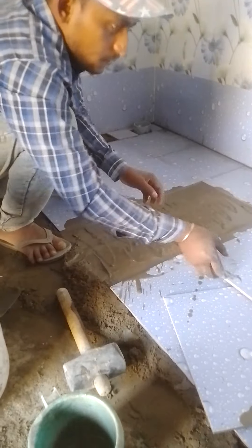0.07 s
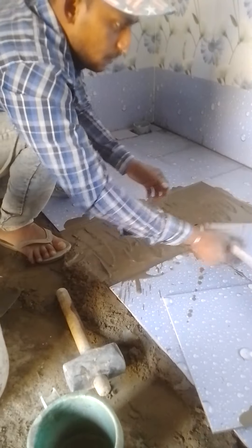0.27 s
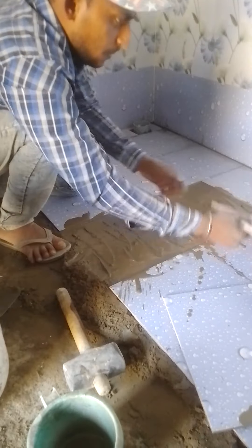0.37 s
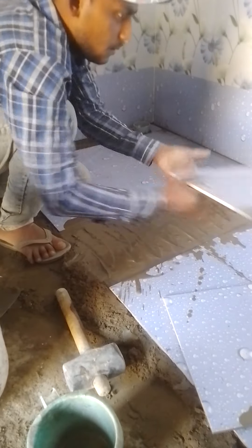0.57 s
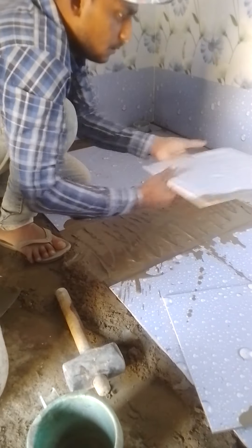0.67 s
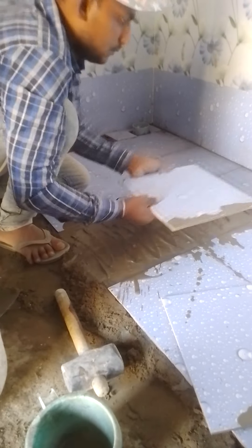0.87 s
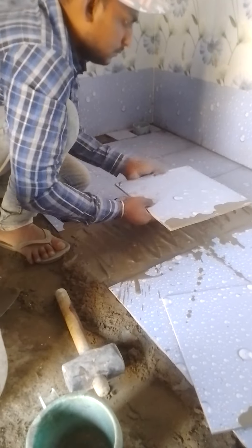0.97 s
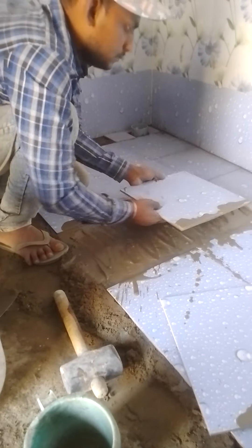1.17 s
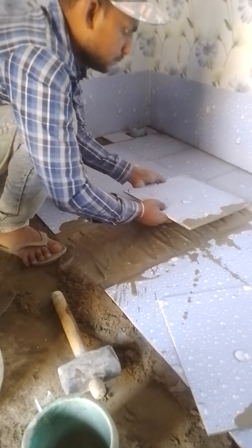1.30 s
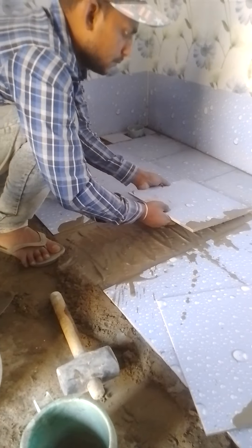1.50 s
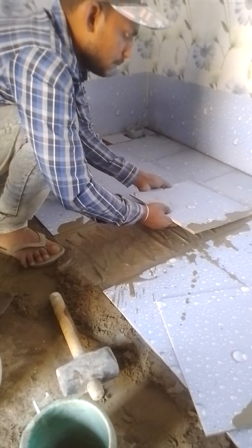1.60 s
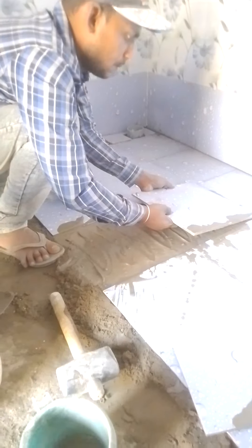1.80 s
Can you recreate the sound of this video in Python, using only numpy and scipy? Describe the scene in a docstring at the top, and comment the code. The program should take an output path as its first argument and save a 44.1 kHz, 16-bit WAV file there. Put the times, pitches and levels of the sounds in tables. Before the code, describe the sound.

In a small, hard-walled bathroom, two ceramic tiles knock together in a quick, ringing clatter. A light tick and faint sliding follow, then one tile settles into wet mortar with a muffled thud, over a faint, low motor hum.

```python
"""A ceramic floor tile clatters against another as it is picked up in a small tiled bathroom.
Each knock makes both tiles ring. The tile ticks once more, and its gritty edge slides off the other.
Then it is laid on wet mortar, which muffles it to a soft, gritty thud.
The hard walls ring after the knocks, slides and thud, and a distant motor hums low."""
import sys
import numpy as np
from scipy import signal
from scipy.fft import rfft, irfft
from scipy.io import wavfile
from scipy.ndimage import uniform_filter1d

SR = 44100
rng = np.random.default_rng(int(sys.argv[2]) if len(sys.argv) > 2 else 0)


def bounce(signal):
    """Save signal as a 16-bit WAV file at the path given by the first command-line argument."""
    frames = np.transpose(np.atleast_2d(signal))
    limited = np.clip(frames, -1, 1)
    pcm = np.round(limited * 32767).astype(np.int16)
    wavfile.write(sys.argv[1], SR, pcm)


N = 81585
TIME = np.arange(N) / SR

# Levels are relative. A ring_s is the time to fade by 60 dB; a decay_s, to fall to about a third.
# Tile hitting tile: start_s, level_db, bass_db, treble_db, held_tile_db, snap_db, contact_decay_s
KNOCK_EVENTS = [(0.2063, -4, -4.5, 1.5, -13, -21, 0.0062), (0.2228, -3, 5, 2, 6, -18, 0.0091),
                (0.2270, -2, -1, 1.5, -31, -6, 0.0032), (0.2435, -3.5, 2.5, -23, -18, -7.5, 0.008),
                (0.250, -9, -2, 0, 4, -21, 0.0045), (0.262, -5, 7.5, -2, -12.5, -14, 0.00674),
                (0.275, -5, 1.5, -1, -4, -18, 0.0051), (0.288, -6.5, 3.5, 3, -6, -18, 0.0055),
                (0.319, -8, 0, 1.5, 0.5, -14, 0.0046), (0.3240, -7, 3.5, -3.5, 3, -4, 0.0059),
                (0.332, -9.5, -19, 2, 1, -12, 0.0055), (0.4822, -15.5, -6.5, 3.5, 11, -1, 0.0045)]
# Ringing notes of the tile that is hit: pitch_hz, level_db, ring_s
STRUCK_TILE_NOTES = [(669, -6, 0.17), (706.6, -2, 0.12), (738, -6.5, 0.13), (1115, -6.5, 0.17),
                     (1150, -4.5, 0.077), (1196, -5, 0.063), (1628, -1, 0.1), (1735, -10, 0.2),
                     (2040, 2, 0.14), (2103, -3.5, 0.083), (2680, -3, .08), (2880, -14, 0.14),
                     (3163, -3, 0.078), (3280, -4.5, 0.17), (3790, -0.5, 0.048), (4143, 7.5, 0.068),
                     (4166, -9, 0.1), (4230, -5.5, 0.039), (4420, -4.5, 0.036), (4854, -5.5, 0.11),
                     (5770, -7.5, 0.059), (6130, -15, 0.13), (6560, -12, 0.037)]
# Ringing notes of the tile in the hands: pitch_hz, level_db, ring_s
HELD_TILE_NOTES = [(1155, -14.5, 0.046), (1410, -13, 0.094), (1782, -7.5, 0.11), (2062, -6.5, .12),
                   (2188, -1.5, 0.078), (2275, -3.5, 0.15), (2561, -4, 0.096), (3077, -11.5, .15),
                   (3586, -12, 0.063), (3870, -3.5, 0.2), (4148, -10, .12), (4760, -12, 0.06),
                   (6800, -20, 0.03)]
# Broad clack as the tiles meet: pitch_hz, level_db
CLACK_SPECTRUM = [(40, -21.5), (130, -11), (230, 0.5), (350, -17), (550, -16), (850, -10.5), (1200, -3),
                  (2500, -2), (4400, -2), (5300, -8.5), (6800, -8.5), (7800, -28.5), (10000, -35.5),
                  (13000, -45.5), (15500, -48)]
# Bright snap of the glaze, the tile's glassy coat: pitch_hz, level_db
SNAP_SPECTRUM = [(300, -5), (2500, -9.5), (7000, 7), (8500, -12.5), (11000, -18), (13500, -22.5),
                 (15500, -34.5)]
# Chinks of glaze on glaze: start_s, level_db
CHINK_EVENTS = [(0.2275, -40), (0.324, -23), (0.4804, -31)]
# Thin, high sound of a chink: pitch_hz, level_db
CHINK_SPECTRUM = [(500, -25), (2500, 2), (7000, 15), (8500, 0.5), (11000, -18), (13500, -26), (15500, -29)]
# Dull push of the tile's weight on the floor: pitch_hz, level_db
THUMP_SPECTRUM = [(25, -14), (60, -10), (120, -4), (220, 0), (450, -2), (650, -12), (1500, -35),
                  (6000, -70)]
# Edge sliding over tile: start_s, rise_s, hold_s, decay_s, level_db, bass_db, treble_db
SLIDE_STROKES = [(0.033, 0.0042, .01, 0.26, -56, 8, 5), (0.154, 0.052, .002, 0.0029, -34, -4, 2.5),
                 (0.377, 0.025, 0.016, 0.0089, -38, -34, 2.5), (0.61, 0.065, 0.059, 0.054, -47, 8.5, 5),
                 (0.77, 0.014, 0.043, 0.017, -47, 5, 3.5)]
# Tile pressed into mortar: start_s, rise_s, hold_s, decay_s, level_db, bass_db, treble_db
PRESS_STROKES = [(0.908, 0.0097, 0.043, 0.021, -37, -2.5, -1.5),
                 (0.947, 0.0082, 0.058, 0.047, -36, -4, -0.5),
                 (1.034, 0.0054, 0.014, 0.15, -51.5, 5.5, 11.5)]
# Squash of wet mortar: pitch_hz, level_db
SQUASH_SPECTRUM = [(40, -23.5), (110, -30), (180, -5.5), (450, 0), (800, -4.5), (1500, -9.5), (2500, -12.5),
                   (4200, -18), (6500, -29), (8500, -45), (15000, -68)]
# Muffled notes of the tile lying on mortar: pitch_hz, level_db, ring_s
LAID_TILE_NOTES = [(278.6, -8.5, 0.38), (365, -9, 0.43), (436.8, -3.5, 0.47), (619, -5, 0.28),
                   (752, -15, .15), (1010.5, -8, .15), (1427, -8.5, 0.094), (1586, -12.5, .08)]
# How long the bathroom rings: pitch_hz, ring_s
ROOM_RING_TIMES = [(100, 3.86), (250, 2.5), (400, 0.85), (700, 0.59), (1200, 0.66), (2200, 0.59),
                   (4000, 0.33), (6800, 0.38), (9000, .4), (14000, .38)]
# Rise and fall of the distant motor: time_s, level_db
HUM_LEVELS = [(0, -48.5), (0.45, -52.5), (0.7, -51), (1.15, -63.5), (1.28, -53), (1.36, -44.5), (1.5, -40),
              (1.61, -50), (1.72, -41), (1.85, -42)]
# Quiet room air: pitch_hz, level_db
AIR_SPECTRUM = [(20, -7), (50, -5.5), (85, 0.5), (125, -0.5), (185, 5.5), (250, -9), (400, -12), (700, -19),
                (1200, -19.5), (2000, -17.5), (4000, -19.5), (5200, -34.5), (6500, -29), (8500, -55.5),
                (12000, -55), (15500, -71)]
# Lingering echo of earlier work: pitch_hz, level_db
ECHO_SPECTRUM = [(60, -1), (250, 1), (600, -7.5), (2200, -11.5), (4300, -21.5), (6800, -17), (8500, -36),
                 (15000, -41)]


def knocks(level_db=7.5, glaze_db=-10.5):
    """Each knock is a short rattle that rings both tiles and adds a snap of glaze."""
    out = np.zeros(N)
    for start_s, knock_db, bass_db, treble_db, held_db, snap_db, decay_s in KNOCK_EVENTS:
        body = through(both_tiles(struck_db=-2, held_db=held_db), tone(bass_db, treble_db))
        add(body, 0, amp(glaze_db + snap_db) * click(SNAP_SPECTRUM))
        add(out, start_s, amp(level_db + knock_db) * through(rattle(decay_s), body))
    return out


def both_tiles(struck_db, held_db, clack_db=7):
    """One touch makes a clack and sets each tile ringing at its own notes."""
    body = amp(struck_db) * ring(STRUCK_TILE_NOTES, spread_db=1.5)
    body += amp(held_db) * ring(HELD_TILE_NOTES, spread_db=1.5)
    add(body, 0, amp(clack_db) * click(CLACK_SPECTRUM))
    return body


def rattle(decay_s, first_touch=0.214):
    """The force between two edges: a first touch, then a brief chatter."""
    t = TIME[:SR // 25]
    force = rng.standard_normal(len(t)) * np.exp(-t / decay_s)
    force /= np.linalg.norm(force)
    force[0] += first_touch
    fade = np.exp(-(t / (3 * decay_s)) ** 2)
    for _ in range(4):  # make all pitches about equally strong, but keep the rattle short
        flat_spectrum = np.exp(1j * np.angle(rfft(force, 2 * len(t))))
        force = irfft(flat_spectrum)[:len(t)] * fade
    return force / np.linalg.norm(force)


def chinks(rise_s=0.002, decay_s=0.0048):
    """Three of the knocks, including the last light tick, add a brief, bright chink."""
    out = np.zeros(N)
    burst = np.minimum(TIME / rise_s, 1) * np.exp(-TIME / decay_s)
    for start_s, level_db in CHINK_EVENTS:
        add(out, start_s, amp(level_db) * noise(CHINK_SPECTRUM) * burst)
    return out


def floor_thump(start_s=0.206, level_db=-32, rise_s=0.0024, hold_s=0.016, decay_s=0.047):
    """The tile's weight gives the floor a short, low push."""
    t = TIME - start_s
    push = np.clip(t / rise_s, 0, 1) * np.exp(-np.maximum(t - hold_s, 0) / decay_s)
    return amp(level_db) * push * noise(THUMP_SPECTRUM)


def slides(level_db=-1.5, hiss_db=-10):
    """The gritty edge scrapes over the other tile and keeps both ringing."""
    body = both_tiles(struck_db=-13.5, held_db=0)
    add(body, 0, amp(hiss_db) * click(SNAP_SPECTRUM))
    scrape = sum(rub(stroke, grains_per_s=1300, spread_db=0) for stroke in SLIDE_STROKES)
    return amp(level_db) * through(scrape, body)


def mortar():
    """The tile squashes the wet mortar, which muffles it to a few low notes."""
    body = ring(LAID_TILE_NOTES, spread_db=0)
    add(body, 0, click(SQUASH_SPECTRUM))
    crunch = sum(rub(stroke, grains_per_s=6000, spread_db=2.5) for stroke in PRESS_STROKES)
    return through(crunch, body)


def rub(stroke, grains_per_s, spread_db):
    """Sand grains slip at random during one stroke that swells, holds and dies away."""
    start_s, rise_s, hold_s, decay_s, level_db, bass_db, treble_db = stroke
    sizes = amp(spread_db * np.minimum(rng.exponential(1, N), 4)) * rng.choice([-1, 1], N)
    grit = unit(sizes * (rng.random(N) < grains_per_s / SR))
    t = TIME - start_s
    pressure = np.clip(t / rise_s, 0, 1) ** 2 * np.exp(-np.maximum(t - rise_s - hold_s, 0) / decay_s)
    return through(amp(level_db) * pressure * grit, tone(bass_db, treble_db))


def ring(notes, spread_db):
    """A tile rings as a set of fading pure notes; spread_db varies their strength at random."""
    t, out = TIME[:SR // 2], np.zeros(SR // 2)
    chances = rng.standard_normal(len(notes))
    signs = rng.choice([-1, 1], len(notes))
    for (pitch_hz, level_db, ring_s), chance, sign in zip(notes, chances, signs):
        note = np.sin(2 * np.pi * pitch_hz * t) * die_away(t, ring_s)
        out += sign * amp(level_db + spread_db * chance) * note / np.linalg.norm(note)
    return out


def tone(bass_db, treble_db):
    """A filter for bass and treble, which depend on how hard and where the tile is touched."""
    return make_filter([(380, min(bass_db, 0)), (650, bass_db), (1100, bass_db), (2000, 0.027),
                        (2700, 0.0056), (5000, treble_db), (7000, treble_db), (9000, treble_db - 1.5)])


def bathroom(sound, direct_db=-6.5, walls_db=-6, build_s=0.0012):
    """The sound arrives directly and as many echoes off hard walls, each pitch fading at its own speed."""
    density = np.minimum(0.1 + TIME / 0.08, 1)  # the echoes crowd closer together
    echoes = rng.standard_normal(N) * (rng.random(N) < density) / np.sqrt(density)
    hz, t, bands = signal.stft(echoes, SR, nperseg=256)
    bands *= die_away(t, look_up(ROOM_RING_TIMES, hz)[:, None])
    tail = signal.istft(bands, SR, nperseg=256)[1][:N]
    tail = even_out(tail) * np.minimum(TIME / build_s, 1)
    return amp(direct_db) * sound + amp(walls_db) * through(sound, tail / np.linalg.norm(tail))


def motor_hum(pitch_hz=92.4, waver=0.034, flutter_db=0.54):
    """A distant motor hums one low note that wavers in pitch and loudness."""
    turns = np.cumsum(pitch_hz * (1 + waver * drift(rate_hz=15))) / SR
    level_db = np.interp(TIME, *np.transpose(HUM_LEVELS)) + flutter_db * drift(rate_hz=20)
    return amp(level_db) * unit(np.sin(2 * np.pi * turns))


def room_air(air_db=-49, echo_db=-49, ring_s=0.72):
    """The air rustles steadily while an echo of earlier work dies away."""
    echo = amp(echo_db) * die_away(TIME, ring_s) * noise(ECHO_SPECTRUM)
    return amp(air_db) * noise(AIR_SPECTRUM) + echo


def amp(db):
    """Turns decibels into a number to multiply by."""
    return 10 ** (np.asarray(db) / 20)


def unit(sound):
    """Scales a sound to an average strength (rms) of 1."""
    return sound / np.sqrt(np.mean(sound ** 2) + 1e-20)


def die_away(t, ring_s):
    """A fade that drops 60 dB every ring_s seconds."""
    return np.exp(-np.log(1000) * t / ring_s)


def look_up(table, hz):
    """Reads between a table's rows, with pitches spaced as on a piano."""
    pitches, values = np.transpose(table)
    return np.interp(np.log(hz + 1), np.log(pitches + 1), values)


def add(mix, start_s, sound):
    """Mixes a sound in at the given time."""
    part = mix[max(round(start_s * SR), 0):][:len(sound)]
    part += sound[:len(part)]


def through(sound, response):
    """Plays a sound through an object, given that object's response to one tap."""
    return signal.fftconvolve(sound, response)[:N]


def make_filter(spectrum, size=4096):
    """A response to one tap that starts at once and has the given level at each pitch."""
    log_gain = np.log(amp(look_up(spectrum, abs(np.fft.fftfreq(size, 1 / SR)))))
    gain_and_phase = np.exp(np.conj(signal.hilbert(log_gain)))
    return np.fft.ifft(gain_and_phase).real[:size // 2]


def click(spectrum):
    """A click of energy 1 with the given balance of pitches."""
    response = make_filter(spectrum)
    return response / np.linalg.norm(response)


def noise(spectrum):
    """Steady noise with the given balance of pitches."""
    gain = amp(look_up(spectrum, np.fft.rfftfreq(N, 1 / SR)))
    return unit(irfft(rfft(rng.standard_normal(N)) * gain, N))


def drift(rate_hz):
    """A slow, random wander around zero."""
    keep_slow = np.exp(-(np.fft.rfftfreq(N, 1 / SR) / rate_hz) ** 2)
    return unit(irfft(rfft(rng.standard_normal(N)) * keep_slow, N))


def even_out(response, width_hz=45):
    """Levels broad peaks and dips across the pitches, keeping the fine ripple."""
    spectrum = rfft(response, 2 * N)
    power = uniform_filter1d(abs(spectrum) ** 2, round(width_hz * 2 * N / SR))
    return irfft(spectrum / np.sqrt(abs(power) + 1e-12))[:N]


def scene():
    """The tile in the bathroom, over the background; the thump and chinks get no echo."""
    echoing_tile = bathroom(knocks() + slides() + mortar())
    return (echoing_tile + floor_thump() + chinks() + motor_hum() + room_air())[None]


def record(dry, offset=0.0133, cutoff_hz=15680):
    """Cuts the highest treble and shifts the wave slightly off zero."""
    low_pass = signal.firwin(511, cutoff_hz, window=("kaiser", 9), fs=SR)
    return offset + signal.oaconvolve(dry, low_pass[None], "same")


dry = scene()
out = record(dry)
bounce(out)
```